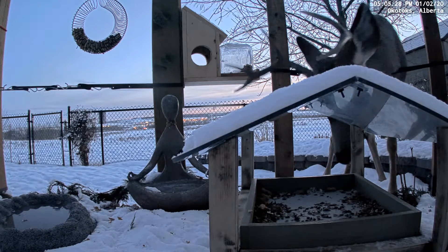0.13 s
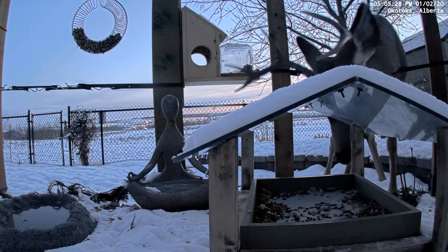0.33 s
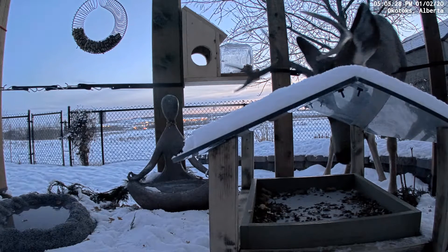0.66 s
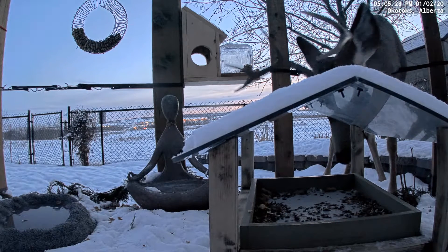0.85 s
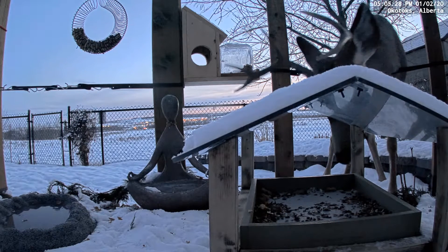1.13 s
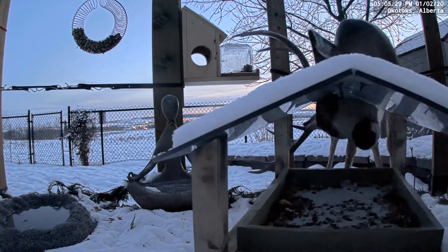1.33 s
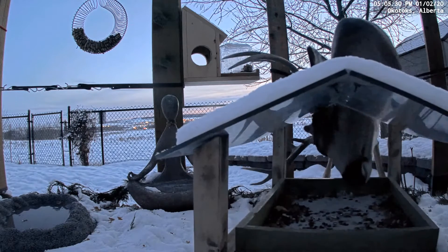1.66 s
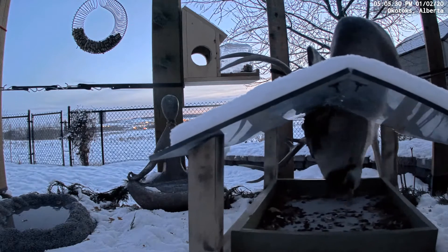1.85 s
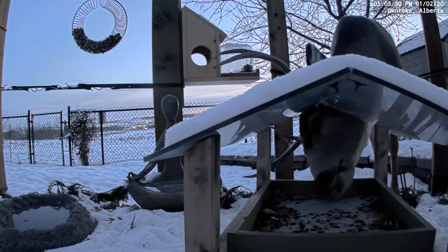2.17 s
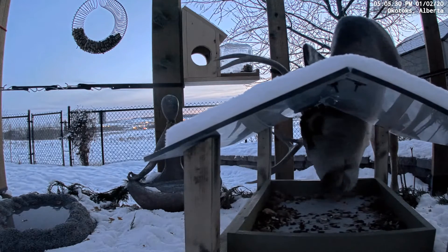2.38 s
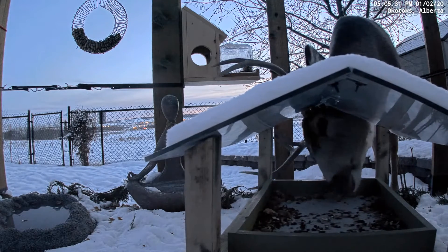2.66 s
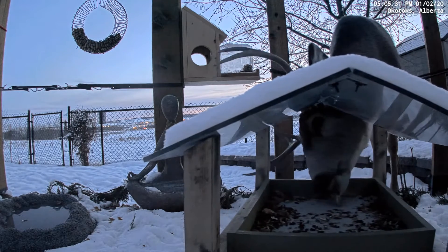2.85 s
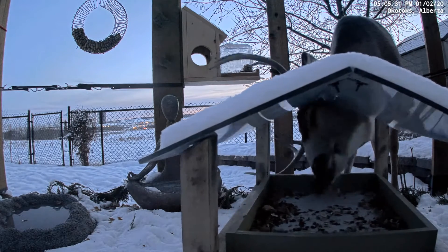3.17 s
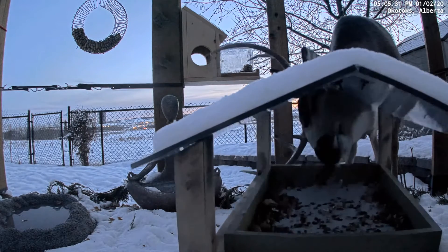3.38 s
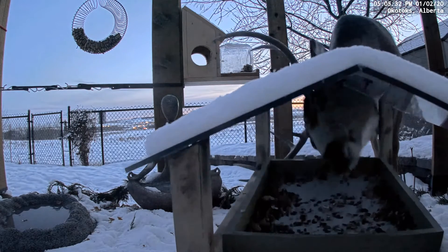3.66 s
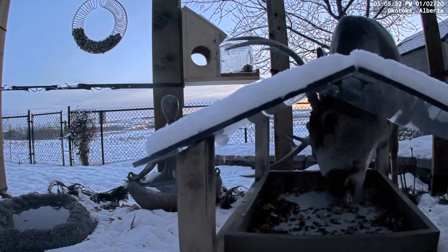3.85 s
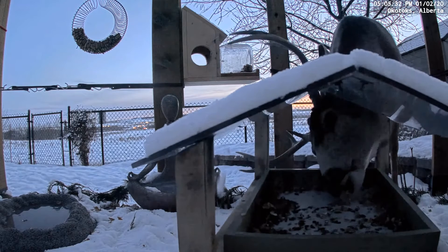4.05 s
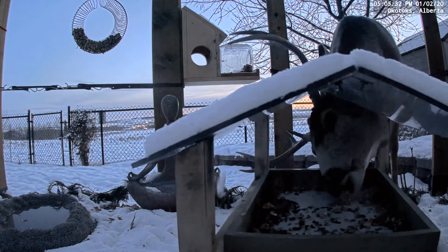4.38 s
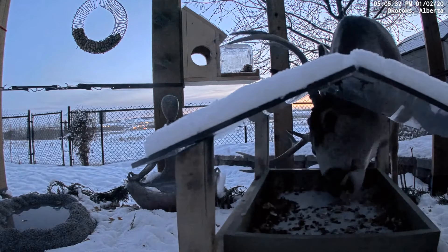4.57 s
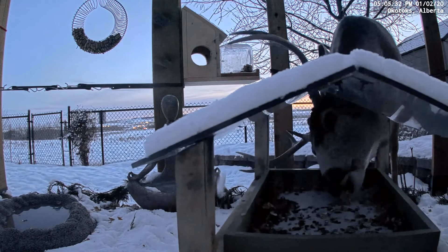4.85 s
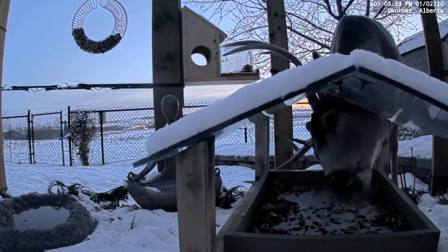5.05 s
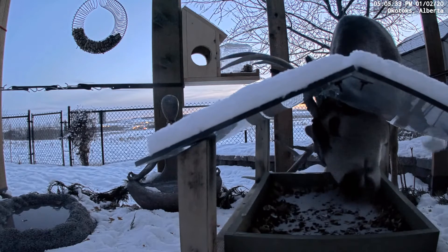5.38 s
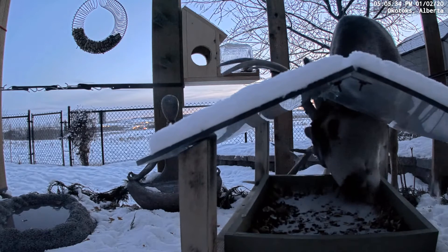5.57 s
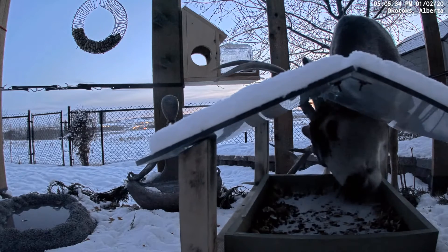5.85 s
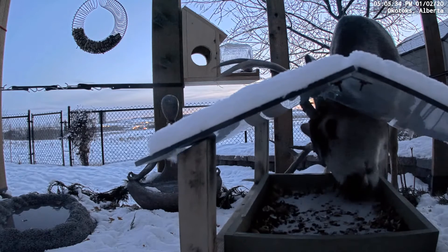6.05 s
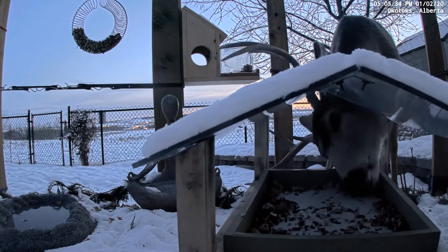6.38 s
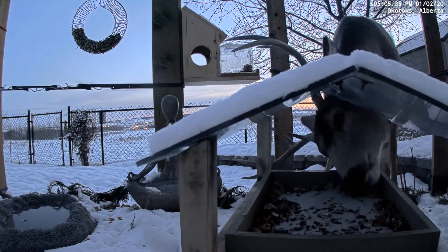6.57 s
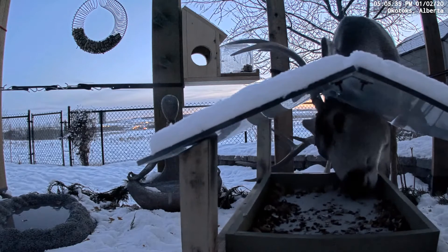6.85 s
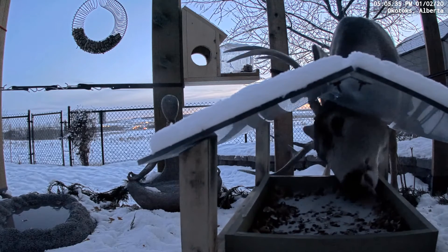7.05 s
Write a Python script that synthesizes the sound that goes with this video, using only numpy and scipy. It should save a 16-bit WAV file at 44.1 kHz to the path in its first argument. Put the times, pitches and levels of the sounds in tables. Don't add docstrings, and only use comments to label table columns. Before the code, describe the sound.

A deer noses through a wooden seed tray close by, with crackling husks, hollow knocks and a heavy rattling shove, then quiet munching and chin taps.

```python
import sys
import numpy as np
from scipy import signal
from scipy.io import wavfile
from scipy.ndimage import uniform_filter1d, minimum_filter1d

SR = 44100
rng = np.random.default_rng(int(sys.argv[2]) if len(sys.argv) > 2 else 0)


def voltage_ratio(level):
    return 10 ** (np.asarray(level, float) / 20)


def to_wav(s):
    ch = np.atleast_2d(s).T
    pcm = np.round(np.clip(ch, -1, 1) * 32767)
    wavfile.write(sys.argv[1], SR, pcm.astype(np.int16))


N = 318402


def evened(x):
    return x / np.sqrt(np.mean(x ** 2) + 1e-20)


def coloured(x, points, size=2048):
    f, db = np.transpose(points)
    hz = abs(np.fft.fftfreq(size, 1 / SR)) + 1
    gain_db = np.interp(np.log(hz), np.log(f), db, left=-70, right=-70)
    spectrum = np.exp(np.conj(signal.hilbert(np.log(voltage_ratio(gain_db)))))
    taps = np.fft.ifft(spectrum).real[:size // 2]
    return signal.oaconvolve(x, taps / np.linalg.norm(taps))[:len(x)]


def add(mix, s, sound):
    part = mix[max(round(s * SR), 0):][:len(sound)]
    part += sound[:len(part)]


def grains(per_s, spread_db, clump_db, clump_s):
    chance, size = rng.random(N), rng.exponential(1, N)
    sign, slow = rng.standard_normal(N), rng.standard_normal(N)
    width = max(round(clump_s * SR), 2)
    clumps = evened(uniform_filter1d(uniform_filter1d(slow, width), width))
    clumps = np.clip(clumps, -3, 1.2)
    level_db = spread_db * np.minimum(size, 2.5) + clump_db * clumps
    return evened((chance < per_s / SR) * sign * voltage_ratio(level_db))


def ring(hz, t60, rise_s):
    t = np.arange(SR // 8) / SR
    rise = 1 - np.exp(-t / max(rise_s, 1e-5))
    mode = rise * voltage_ratio(-60 * t / max(t60, .003)) * np.sin(2 * np.pi * hz * t)
    return mode / abs(mode).max()


# (frequency [Hz], level [dB])
AIR_TONE = [(59, -25), (100, 6.5), (215, -9), (389, -17.5), (560, -7), (1010, -19), (1120, -30.5),
            (2100, -23), (5570, -28), (6740, -28), (7420, -54), (8320, -23.5), (9700, -59), (12600, -71),
            (21300, -120)]


def air():
    frames = N // 256 + 5
    a, b, patches = rng.standard_normal((frames, 513, 3)).T
    patches = evened(uniform_filter1d(uniform_filter1d(patches, 14, 0), 10, 1))
    spectrum = (a + 1j * b) * voltage_ratio(2.0 * patches)
    hiss = signal.istft(spectrum, nperseg=1024, noverlap=768)[1][:N]
    return voltage_ratio(-54.5) * evened(coloured(hiss, AIR_TONE))


# (time [s], level [dB])
ROCKING = [(0.0, -47), (0.06, -48), (1.2, -49.5), (1.87, -39), (2.51, -50.5), (2.79, -44), (3.62, -49.5),
           (3.92, -34), (4.02, -50), (4.15, -40), (4.46, -55), (4.641, -44), (7.22, -50)]
# (frequency [Hz], level [dB])
POST_TONE = [(12, -26), (25, -0.5), (45, -4), (80, -11), (120, -16), (200, -41.5)]
# (time [s], peak level [dB])
JOLTS = [(1.538, -27.5), (1.9, -20.5), (2.7575, -27.5), (2.8058, -34), (3.032, -36), (3.528, -36.5),
         (4.083, -24.5), (6.189, -37.5)]
# (time [s], peak level [dB], swing pitch [Hz])
SWINGS = [(1.454, -34.5, 32), (1.755, -27.5, 23.7), (1.892, -34, 39.2), (2.129, -30.5, 36.5),
          (2.834, -35.5, 30), (3.021, -31.5, 36), (3.759, -31.5, 48.2), (3.835, -26, 49.5),
          (3.9, -22.5, 38), (4.105, -30.5, 35.7), (5.52, -33, 32.7), (6.672, -33.5, 31)]


def frame():
    slow = rng.standard_normal(N)
    lumps_db = 3.1 * evened(uniform_filter1d(uniform_filter1d(slow, size=2500), size=2500))
    rocking_db = np.interp(np.arange(N) / SR, *np.transpose(ROCKING)) + lumps_db
    out = voltage_ratio(rocking_db) * evened(coloured(rng.standard_normal(N), POST_TONE, size=16384))
    push_s, push_db = 0.0005, -0.5
    u = np.arange(SR // 8) / SR / push_s
    jolt = ring(150, t60=0.068, rise_s=0.00032) / 2 + voltage_ratio(push_db) * u * np.exp(1 - u)
    for s, db in JOLTS:
        add(out, s, voltage_ratio(db) * jolt)
    for s, db, hz in SWINGS:
        swing = ring(hz, t60=0.19, rise_s=0.012)
        add(out, s, voltage_ratio(db) * swing * signal.windows.tukey(SR // 8, .3))
    return out


# (start [s], length [s], rustle level [dB], weight level [dB])
HEAD_SHOVES = [(0.757, 0.08, -51, -50.5), (0.877, 0.035, -54, -49), (1.35, 0.13, -49.5, -53.5),
               (1.438, 0.025, -51, -40), (1.474, 0.051, -46.5, -42), (1.518, .012, -68, -55),
               (1.534, .045, -46, -39.5), (1.576, 0.13, -51.5, -53), (1.701, 0.072, -43, -48.5),
               (1.734, 0.085, -47, -38.5), (1.893, 0.026, -58.5, -38.5), (1.922, 0.02, -42, -36),
               (1.949, 0.025, -56, -43), (1.973, 0.05, -45.5, -41.5), (1.992, 0.031, -42, -50),
               (2.033, 0.026, -36, -40), (2.065, 0.12, -47.5, -43), (2.132, 0.042, -37, -44),
               (2.17, 0.031, -38.5, -48), (2.188, .05, -36, -48.5), (2.25, 0.16, -59.5, -51),
               (2.737, .08, -62.5, -49.5), (2.944, 0.079, -58, -42), (3.014, 0.099, -52.5, -45.5),
               (3.733, 0.019, -56.5, -38.5), (3.757, 0.025, -46, -39.5), (3.785, 0.062, -51.5, -40),
               (3.85, 0.097, -45.5, -35), (3.928, 0.085, -55.5, -50), (4.022, 0.011, -63, -39),
               (4.034, 0.056, -42.5, -40.5), (4.1, 0.034, -55.5, -51), (4.142, .06, -63.5, -54),
               (4.16, 0.017, -48, -55), (5.695, 0.053, -50, -50.5), (5.737, 0.052, -54.5, -52.5),
               (5.984, 0.071, -56, -58.5)]
# (start [s], length [s], rustle level [dB], weight level [dB])
LIP_SWEEPS = [(0.305, 0.18, -75, -57), (0.612, 0.34, -55, -55), (0.86, 0.37, -47.5, -49),
              (1.273, 0.3, -55.5, -59), (2.392, 0.23, -63.5, -59.5), (2.536, 0.22, -60.5, -60),
              (2.798, 0.19, -65.5, -59.5), (3.104, 0.21, -66, -61), (3.267, 0.27, -60.5, -58),
              (3.399, 0.32, -55.5, -52.5), (4.178, 0.25, -63.5, -59.5), (4.332, 0.41, -59, -52.5),
              (4.61, 0.31, -62, -57), (4.85, 0.21, -69, -62.5), (5.019, 0.18, -65, -58),
              (5.171, 0.18, -62.5, -71), (5.459, 0.21, -63.5, -61.5), (5.775, 0.12, -58.5, -59),
              (5.873, 0.12, -51.5, -62.5), (6.057, 0.081, -58, -67), (6.133, 0.2, -60, -65),
              (6.265, 0.28, -62, -60.5), (6.48, 0.21, -59, -67.5), (6.645, 0.32, -64, -57),
              (6.984, 0.24, -59.5, -59.5), (7.096, 0.15, -69, -59.5)]


def moves():
    t = np.arange(0, N + 64, 64) / SR
    attack_s, release_s, sag_db = 0.006, 0.0064, -2
    rest_db = np.array([-73.5, -64])
    power = voltage_ratio(2 * rest_db)[:, None] * np.ones(len(t))
    for start, length, *levels in HEAD_SHOVES:
        u = t - start
        shape = np.clip(u / attack_s, 0, 1) * np.exp(-np.maximum(u - length, 0) / release_s)
        shape = shape * voltage_ratio(sag_db * np.clip(u / length, 0, 1))
        power = power + (voltage_ratio(np.array(levels))[:, None] * shape) ** 2
    for start, length, *levels in LIP_SWEEPS:
        arch = abs(np.sin(np.pi * np.clip((t - start) / length, 0, 1))) ** 1.2
        power = power + (voltage_ratio(np.array(levels))[:, None] * arch) ** 2
    return [np.interp(np.arange(N) / SR, t, 10 * np.log10(p)) for p in power]


# (frequency [Hz], level [dB])
FINE_TONE = [(5200, -27.5), (6600, 0), (8000, 1), (9600, -1.5)]
HUSK_TONE = [(2800, -27.5), (3800, -4.5), (5200, -3), (6400, -1), (8000, -27)]
SCRAPE_TONE = [(500, -21), (800, 1.5), (1300, 3), (1800, -2.5), (2100, -12), (2500, -5.5), (3300, -18.5),
               (5000, -40)]
TRAY_TONE = [(90, -46.5), (180, -5), (300, 1), (500, 0.5), (680, -1), (1000, -34), (2000, -44)]


def feeding():
    fine_db, tray_db = moves()
    rustle_up, weight_up = fine_db + 55, tray_db + 55
    husks_db = 0.78 * rustle_up + 0.28 * weight_up - 59
    scrape_db = 0.5 * rustle_up + 0.57 * weight_up - 56.5
    touch = grains(per_s=9000, spread_db=-3.0, clump_db=3.5, clump_s=0.0013)
    slips = grains(per_s=1600, spread_db=1.5, clump_db=1.5, clump_s=.006)
    seeds = coloured(voltage_ratio(fine_db) * touch, FINE_TONE)
    husks = coloured(voltage_ratio(husks_db) * touch[::-1], HUSK_TONE)
    scrape = coloured(voltage_ratio(scrape_db) * evened(touch + 0.27 * slips), SCRAPE_TONE)
    drumming = coloured(voltage_ratio(tray_db) * slips, TRAY_TONE)
    return seeds + husks + scrape + drumming


# (frequency [Hz], level [dB])
SNOW_TONE = [(5800, -26), (7000, -3.5), (8300, 0), (9200, -10)]


def snow():
    t = np.arange(N) / SR
    start_s, end_s = 0.2, 0.67
    level = voltage_ratio(np.interp(t, [start_s, end_s], [-69, -57])) * (t > start_s) * (t < end_s)
    return coloured(uniform_filter1d(level, size=1500) * rng.standard_normal(N), SNOW_TONE)


# (time [s], bright level [dB], woody level [dB], die-away t60 [s],
# shell pitch [Hz])
ROOF_SNAPS = [
    (0.7464, -22, -33, 0.013, 5800),
    (0.75, -34, -46, 0.0092, 5800),
    (0.7704, -15.5, -31, 0.022, 5270),
    (0.7692, -19, -29, 0.024, 7030),
    (0.7738, -19, -27, 0.017, 5900),
    (0.7685, -25, -42, 0.02, 9300),
]
# (time [s],
# bright level [dB], woody level [dB], shell pitch [Hz], wood pitch [Hz])
HUSK_CRACKS = [(0.8279, -30, -36, 8630, 1020), (1.0855, -20.5, -24, 5380, 1600),
               (1.1019, -20.5, -32.5, 8300, 1556), (1.457, -24, -30, 7900, 1400),
               (1.483, -31.5, -34, 7450, 1500), (1.538, -27, -33, 9330, 790),
               (1.7439, -23, -20.5, 4390, 1670), (1.756, -23.5, -28, 8000, 1840),
               (1.744, -21.5, -32, 8680, 2500), (1.8021, -27, -30.5, 5270, 1540),
               (1.8998, -43, -26.5, 6550, 900), (1.921, -19, -18.5, 4700, 870),
               (1.976, -31, -37, 6700, 840), (1.98, -36, -41, 7400, 800),
               (2.0181, -21.5, -23.5, 8020, 1330), (2.019, -25, -22.5, 4500, 2440),
               (2.1361, -24, -23, 8630, 760), (2.1448, -17, -23.5, 9250, 1460),
               (2.2355, -26, -27, 7400, 1660)]
LATER_CRACKS = [(2.597, -37.5, -39.5, 6170, 785), (2.7575, -44.5, -34.5, 6800, 1100),
                (3.076, -29, -29.5, 5800, 2340), (3.6413, -44, -30.5, 6400, 1510),
                (3.6406, -48, -38.5, 3300, 2500), (3.7576, -35, -28.5, 6860, 1140),
                (3.786, -30.5, -24, 6990, 850), (3.819, -41, -30, 7000, 646),
                (3.8465, -38, -27, 8170, 1170), (3.9154, -25.5, -20.5, 4300, 1390),
                (3.922, -17.5, -28, 6270, 2690), (3.9214, -22, -26, 4450, 930),
                (4.021, -27, -29.5, 5280, 1430), (4.02, -35, -29.5, 8410, 3400),
                (4.1668, -41.5, -46, 5900, 1520), (5.7, -42, -42, 7870, 1560),
                (7.12, -43.5, -41, 8160, 3140), (1.813, -47, -28.5, 8550, 1145),
                (4.037, -42, -34, 5330, 3390), (6.562, -42.5, -46, 6000, 2260),
                (6.584, -38.5, -48, 4000, 1970), (6.872, -44, -50, 8600, 1200),
                (3.487, -42.5, -57, 8030, 1500), (3.504, -50, -51, 6950, 2000),
                (5.736, -44, -42, 8500, 1490), (5.083, -51, -48.5, 6000, 1100)]
# (time [s], level [dB], shell pitch [Hz])
LIP_TICKS = [(1.1128, -31, 5360), (1.3614, -33, 5100), (1.508, -33, 7420), (1.699, -44, 9000),
             (1.7145, -30.5, 6600), (1.9215, -20.5, 8550), (2.01, -27, 8800), (2.5119, -38, 6000),
             (2.5112, -40.5, 4000), (3.9235, -12, 5580), (1.538, -30, 8000), (1.803, -32.5, 7570),
             (1.457, -25.5, 5410), (2.8885, -36, 8340), (2.9465, -46, 6000), (3.3582, -43.5, 9150),
             (3.3747, -40, 8490), (3.535, -38.5, 7640), (3.578, -29.5, 6650), (4.3894, -48, 8000),
             (4.7683, -46, 8100), (5.0753, -50, 6850), (5.525, -48, 8500), (5.5632, -46, 7200),
             (5.8288, -43, 7950), (5.939, -33, 6450), (5.943, -40, 8870), (5.9858, -33.5, 6430),
             (5.99, -37.5, 4000), (5.997, -33.5, 8560), (6.1, -48.5, 6560), (6.426, -39.5, 7120),
             (6.82, -42.5, 8430), (7.026, -37, 4000), (7.065, -44, 8200), (7.152, -37.5, 8100)]
# (frequency [Hz], level [dB])
SEED_TONE = [(2500, -7.5), (3600, -8), (4800, -0.5), (6500, -3.5), (8500, -0.5), (10400, -10.5)]


def cracks():
    bright, woody, t = np.zeros(N), np.zeros(N), np.arange(2000) / SR
    crack_t60, tick_t60, rise_s = 0.015, 0.015, .0019
    shell_width_hz, wood_width_hz = 1100, 280
    snaps = [(s, db, woody_db, crack_t60, hz, wood_hz)
             for s, db, woody_db, hz, wood_hz in [*HUSK_CRACKS, *LATER_CRACKS]]
    snaps += [(s, db, db - 15, tick_t60, hz, hz / 4) for s, db, hz in LIP_TICKS]
    snaps += [(*row, 1500) for row in ROOF_SNAPS]
    noises = rng.standard_normal((len(snaps), 2, 2000))
    for (s, bright_db, woody_db, t60, hz, wood_hz), noise in zip(snaps, noises):
        shape = (1 - np.exp(-(t / rise_s) ** 2)) * voltage_ratio(-60 * t / max(t60, .004))
        shape = shape / shape.max()
        shell = signal.lfilter(*signal.iirpeak(hz, hz / shell_width_hz, SR), noise[0])
        burst = evened(shell) + .55 * noise[0]
        burst = burst + 0.9 * np.roll(burst, round(3 * SR / hz))
        add(bright, s - .001, voltage_ratio(bright_db - 11.5) * evened(burst) * shape)
        splinter = noise[1] * shape
        grain = signal.lfilter(*signal.iirpeak(wood_hz, wood_hz / wood_width_hz, SR), splinter)
        add(woody, s - .0005, voltage_ratio(woody_db - 5.0) * 0.54 * coloured(splinter, SCRAPE_TONE))
        add(woody, s - .0005, voltage_ratio(woody_db + 10.0) * grain)
    return coloured(bright, SEED_TONE) + woody


# (delay [s], level [dB])
BOUNCES = [
    (0, 5.5),
    (.00066, -7.5),
    (.00197, -11),
    (.0033, -6.5),
    (.0039, -3),
    (.0078, -10),
]
# (frequency [Hz], level [dB], die-away t60 [s])
ROOF_RING = [(591, -10.5, 0.055), (874, -1.5, 0.025), (1100, -3.5, 0.025), (1336, -4.5, 0.029),
             (1540, 1, 0.016), (1870, 0, 0.022), (2280, -9.5, 0.032)]


def antler():
    blow_s, blow_db = .7703, -15
    panel = -sum(voltage_ratio(db) * ring(hz, 0.68 * t60, 0.000177) for hz, db, t60 in ROOF_RING)
    out = np.zeros(N)
    add(out, blow_s - .0003, voltage_ratio(-4) * np.hanning(12))
    for delay, db in BOUNCES:
        add(out, blow_s + delay, voltage_ratio(blow_db + db) * panel)
    return signal.sosfilt(signal.butter(2, 520, "high", fs=SR, output="sos"), out)


# (time [s], peak level [dB], board pitch [Hz])
BOARD_KNOCKS = [(1.361, -42.5, 334), (1.452, -27.5, 418), (1.537, -27, 323), (1.742, -27.5, 350),
                (1.759, -29, 700), (1.899, -17.5, 525), (1.923, -23, 264), (1.971, -31, 337),
                (2.137, -28, 494), (2.235, -22.5, 636), (2.757, -29.5, 487), (2.805, -42, 235),
                (2.976, -26, 437), (3.022, -36, 466), (3.034, -43, 263), (3.076, -28, 623),
                (3.74, -23, 451), (3.757, -17.5, 452), (3.787, -18.5, 235), (3.817, -22, 320),
                (3.85, -15.5, 306), (3.872, -19.5, 459), (3.905, -11.5, 258), (3.918, -15.5, 562),
                (3.933, -22.5, 324), (4.018, -28, 507), (4.085, -23.5, 291), (6.192, -36, 418),
                (7.121, -29.5, 929)]
# (time [s], peak level [dB], board pitch
# [Hz])
MORE_KNOCKS = [(3.743, -18.5, 464), (3.767, -21, 315), (3.777, -25.5, 285), (3.79, -20, 520),
               (3.801, -32, 402), (3.809, -30.5, 328), (3.821, -23.5, 486), (3.831, -26, 295),
               (3.846, -28, 590), (3.86, -25, 358), (3.881, -30, 405), (3.893, -22.5, 280),
               (3.903, -26.5, 877), (3.908, -17.5, 301), (3.945, -34, 346), (3.914, -17.5, 175),
               (3.753, -23, 165), (3.852, -22.5, 168), (1.459, -32, 520), (1.477, -30, 330),
               (1.51, -35, 303), (1.582, -36, 353), (1.931, -36, 446), (1.981, -33, 534), (2.956, -38, 462),
               (2.967, -34, 404), (4.1, -36.5, 388), (7.122, -34.5, 520)]
# (time [s], peak level [dB])
CHIN_TAPS = [(2.597, -42), (3.53, -45), (4.355, -44), (4.782, -50), (5.037, -39.5), (5.084, -34.5),
             (5.334, -41.5), (5.361, -36), (5.459, -44.5), (5.779, -54), (5.818, -36), (5.997, -30),
             (6.05, -38.5), (6.922, -43.5)]
# (pitch factor [ratio], level [dB], die-away factor [ratio])
BOARD_RING = [(1, 3.5, 0.62), (0.508, -5.5, 0.53), (1.728, -8.5, 0.99), (3, -15.5, 0.31)]


def knocks():
    out = np.zeros(N)
    blows = [(s, db, hz, 0.047 * (400 / hz) ** 0.17) for s, db, hz in [*BOARD_KNOCKS, *MORE_KNOCKS]]
    blows += [(s, db, 519, 0.041) for s, db in CHIN_TAPS]
    detunes = rng.uniform(0.846, 1.107, (len(blows), len(BOARD_RING)))
    for (s, db, hz, t60), detune in zip(blows, detunes):
        for (factor, part_db, shorter), d in zip(BOARD_RING, detune):
            part_hz = hz * factor * d if factor != 1 else hz
            add(out, s, voltage_ratio(db - 4.0 + part_db) * ring(part_hz, t60 * shorter, 0.0025))
    return out


# (start [s], length [s], level [dB], lowest tone level [dB])
ANTLER_DRAGS = [
    (2.145, .11, -40, 4),
    (4.037, 0.049, -45.5, -3),
    (5.7, .05, -52, -2),
    (2.035, .028, -43, -5),
]
# (frequency [Hz], width [Hz], level [dB])
BOARD_HUM = [(657, 28, 0), (1238, 35, -2.5), (1567, 50, -3), (2500, 54, -13), (4000, 110, -9),
             (5300, 65, -13)]


def drags():
    out = np.zeros(N)
    rubs = rng.standard_normal((len(ANTLER_DRAGS), SR // 4))
    for (start, length, db, low_db), rub in zip(ANTLER_DRAGS, rubs):
        modes = []
        for hz, width_hz, mode_db in BOARD_HUM:
            tone = signal.lfilter(*signal.iirpeak(hz, hz / width_hz, SR), rub)
            modes.append(voltage_ratio(mode_db) * evened(tone))
        hum = (voltage_ratio(low_db) * modes[0] + sum(modes[1:]))[-round(length * SR):]
        add(out, start, voltage_ratio(db) * hum * signal.windows.tukey(len(hum), .3))
    return out


def scene():
    mix = air() + frame() + feeding() + snow() + cracks() + antler() + knocks() + drags()
    return mix[None]


def coarse(x, step_db, scatter_db, top_hz, size, band_count, group_size):
    n, k = np.arange(2 * size)[:, None] + .5, np.arange(size) + .5
    window = np.sin(np.pi * n / (2 * size))
    basis = window * np.cos(np.pi / size * (n + size / 2) * k) * np.sqrt(2 / size)
    rows = np.pad(x, (size, 2 * size - len(x) % size)).reshape(-1, size)
    lines = (np.hstack([rows[:-1], rows[1:]]) @ basis).reshape(len(rows) - 1, band_count, -1)
    own = np.sqrt((lines ** 2).mean(2)) + 1e-9
    masker = -minimum_filter1d(minimum_filter1d(-own, group_size, 0), 3, 1)
    level = own ** .55 * masker ** .45
    band_hz = np.arange(band_count) * SR / 2 / band_count
    fine_db = -30 * np.exp(-band_hz / 700)
    scatter = scatter_db * rng.standard_normal(level.shape)
    step = (np.minimum(level, voltage_ratio(-26.5)) * voltage_ratio(step_db + fine_db + scatter))[..., None]
    kept = (np.round(lines / step) * step).reshape(-1, size)
    edge_hz = top_hz + 100 * rng.standard_normal((len(lines), 1))
    blocks = (kept * (k * SR / 2 / size < edge_hz)) @ basis.T
    return (blocks[1:, :size] + blocks[:-1, size:]).ravel()[:len(x)]


def low_pass(x):
    return signal.sosfilt(signal.butter(12, 10950, fs=SR, output="sos"), x)


def record(dry):
    band_limit = signal.firwin(101, 10400, window=("kaiser", 8), fs=SR)
    x = signal.oaconvolve(dry[0], band_limit, "same")
    treble = np.diff(x, prepend=0) ** 2
    sudden = uniform_filter1d(treble, 128) > 4.6 * uniform_filter1d(treble, 1536, origin=640)
    near_sudden = uniform_filter1d(1. * sudden, 1280) > 1e-6
    short = uniform_filter1d(1. * near_sudden, 256)
    steady = coarse((1 - short) * x, 8.0, 5.0, 9600, size=1024, band_count=128, group_size=1)
    quick = coarse(short * x, 3.0, 4.0, 11000, size=128, band_count=32, group_size=7)
    mix = (1 - short ** 4) * steady + quick
    return low_pass(mix[None])


dry = scene()
out = record(dry)
to_wav(out)
```